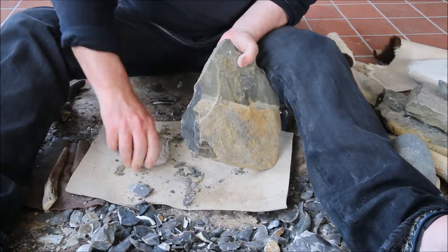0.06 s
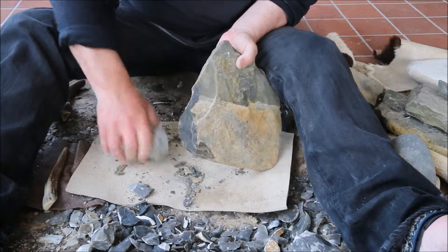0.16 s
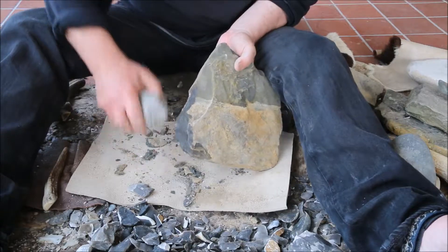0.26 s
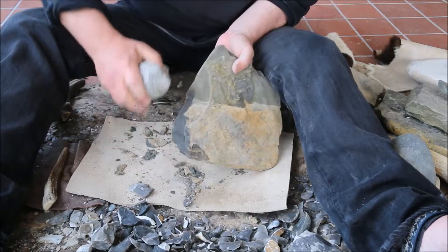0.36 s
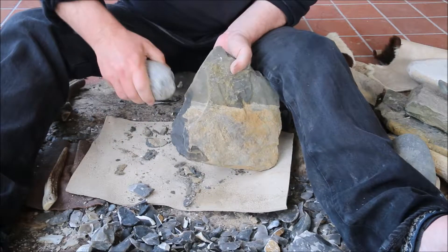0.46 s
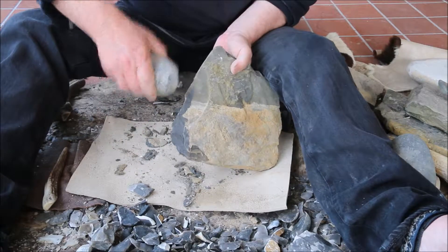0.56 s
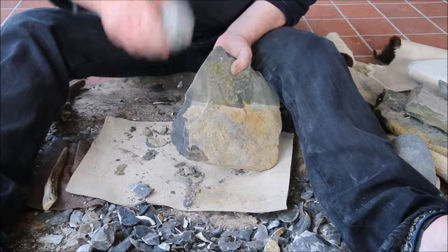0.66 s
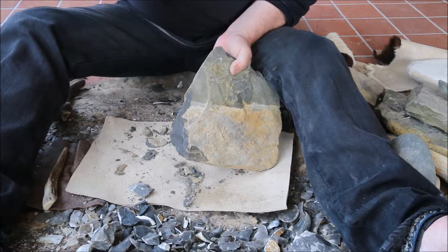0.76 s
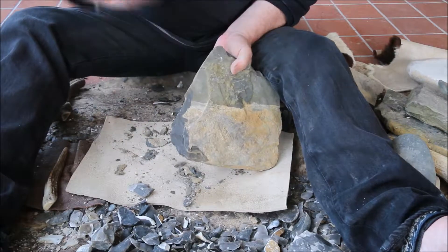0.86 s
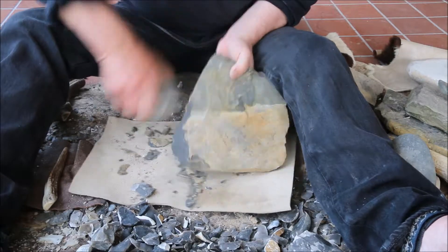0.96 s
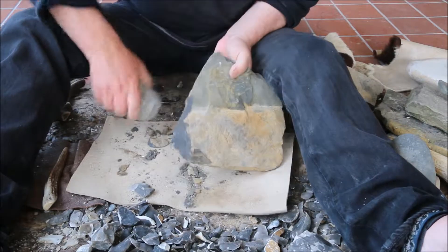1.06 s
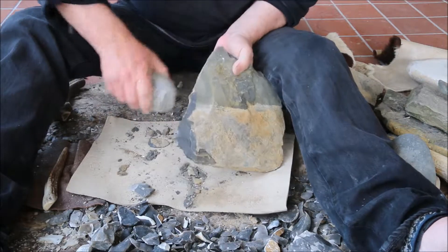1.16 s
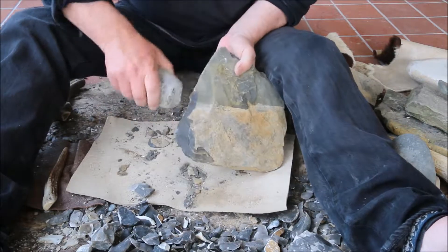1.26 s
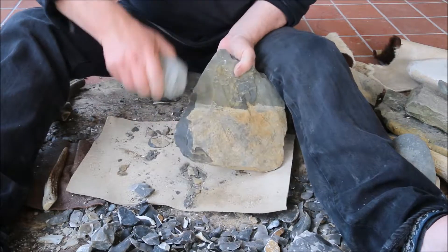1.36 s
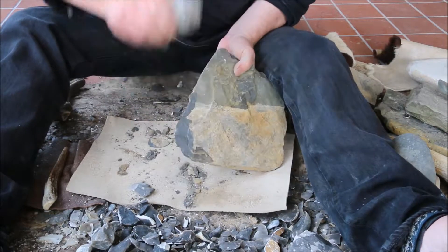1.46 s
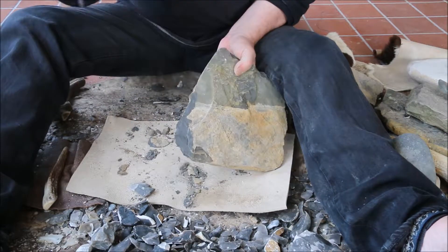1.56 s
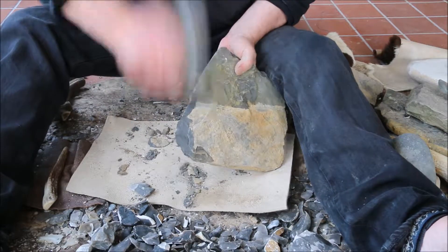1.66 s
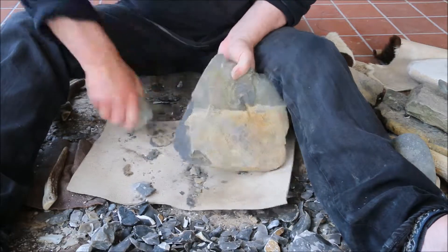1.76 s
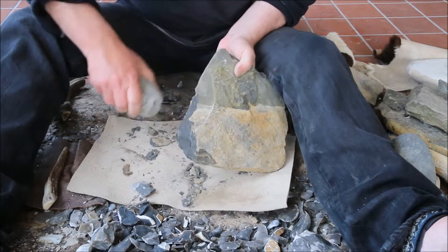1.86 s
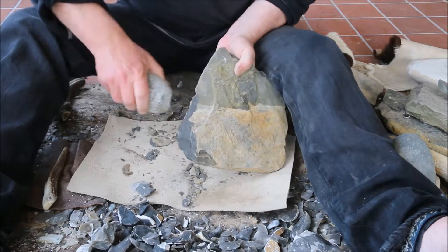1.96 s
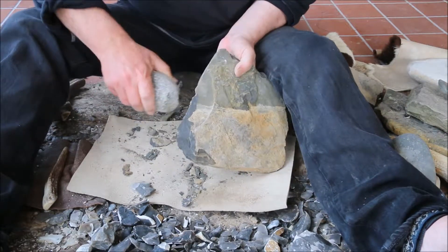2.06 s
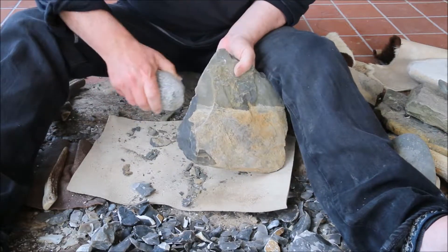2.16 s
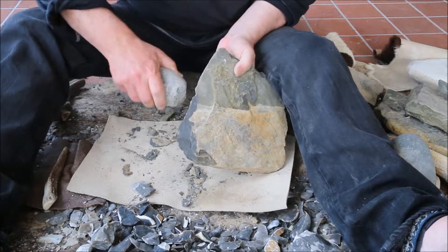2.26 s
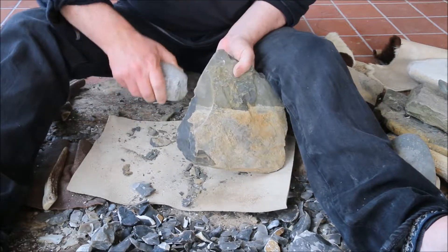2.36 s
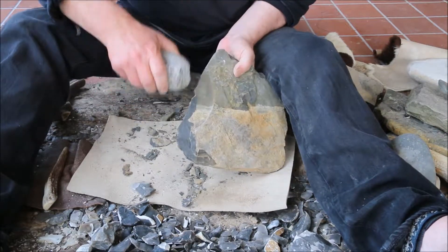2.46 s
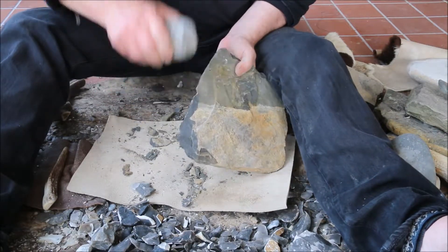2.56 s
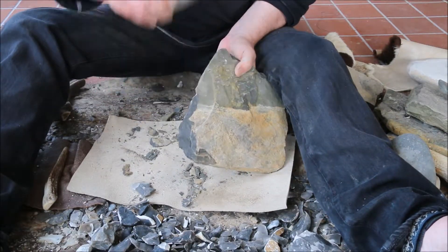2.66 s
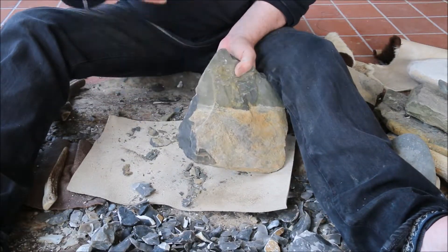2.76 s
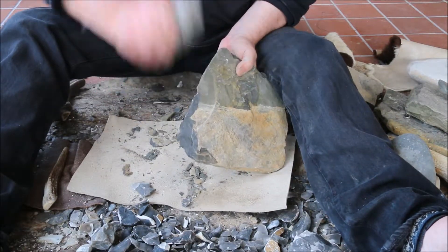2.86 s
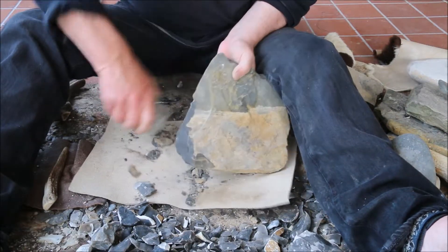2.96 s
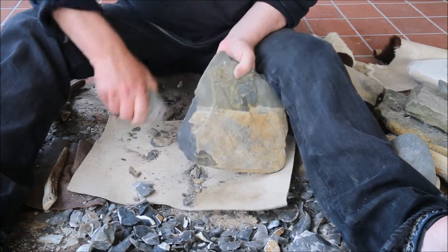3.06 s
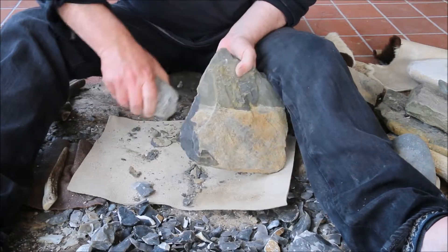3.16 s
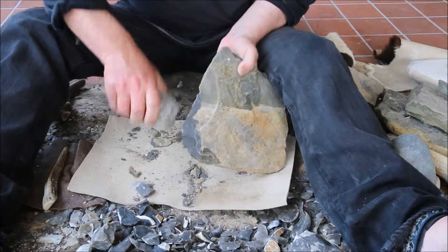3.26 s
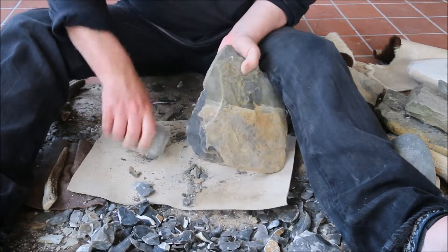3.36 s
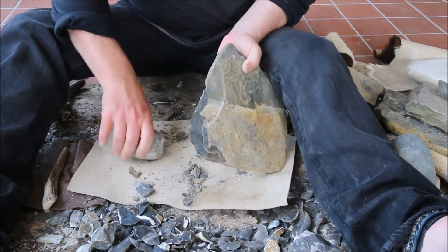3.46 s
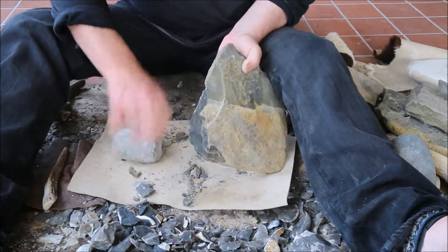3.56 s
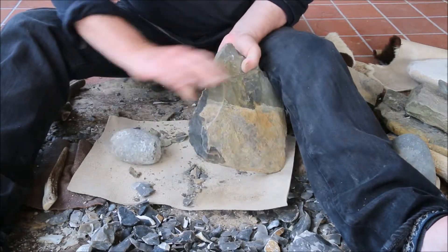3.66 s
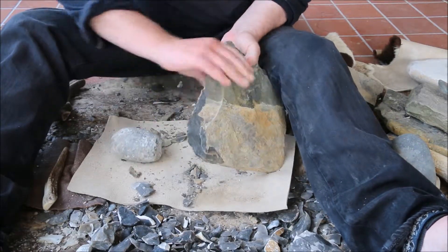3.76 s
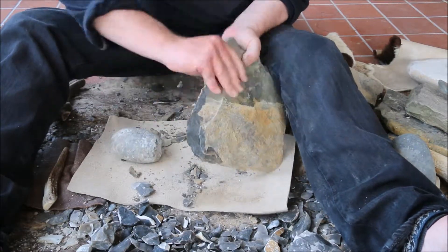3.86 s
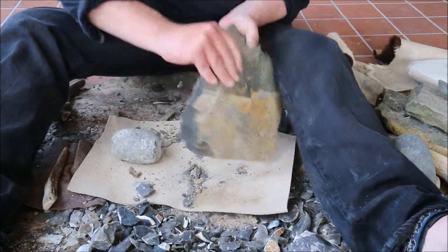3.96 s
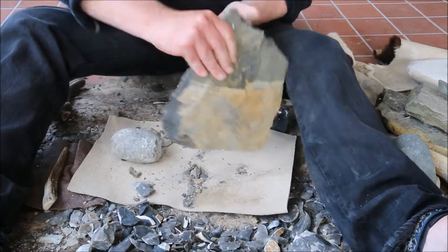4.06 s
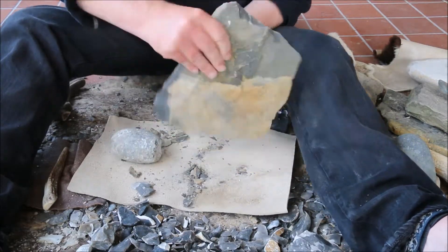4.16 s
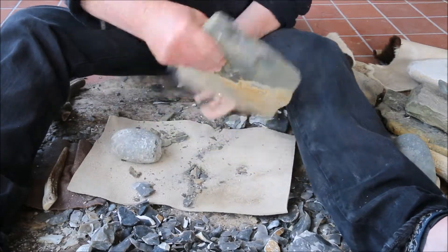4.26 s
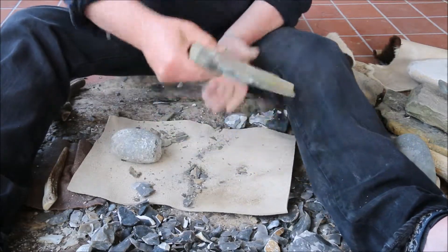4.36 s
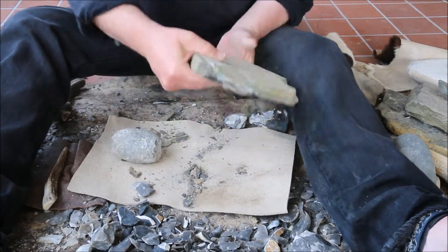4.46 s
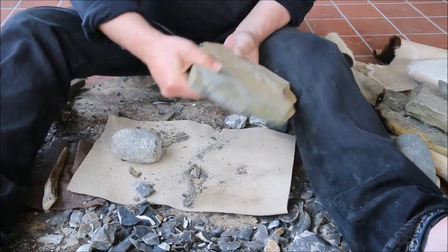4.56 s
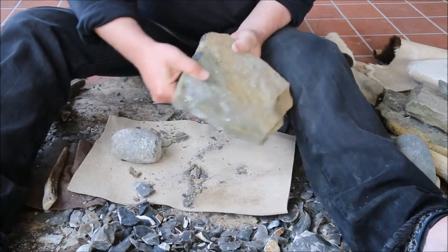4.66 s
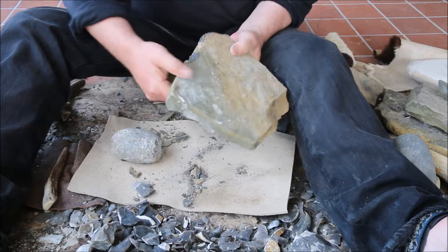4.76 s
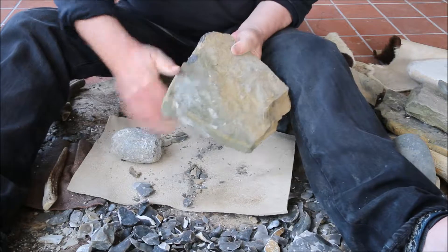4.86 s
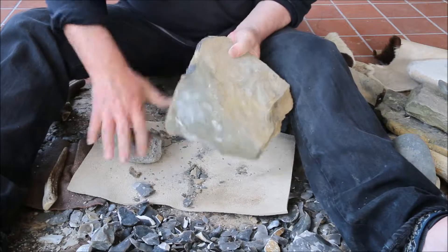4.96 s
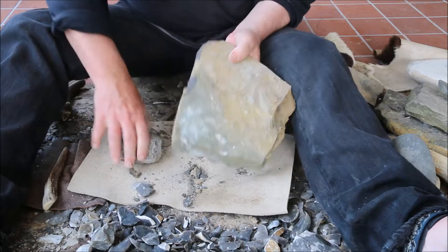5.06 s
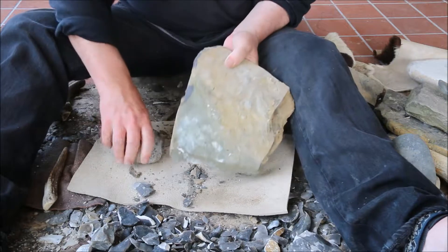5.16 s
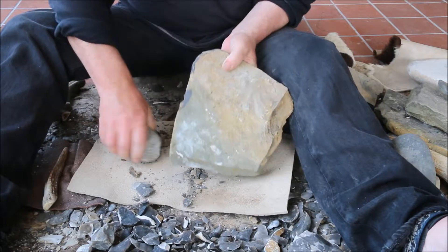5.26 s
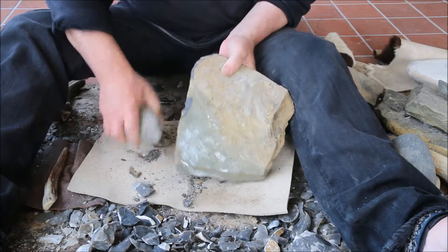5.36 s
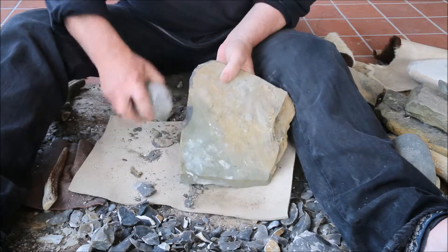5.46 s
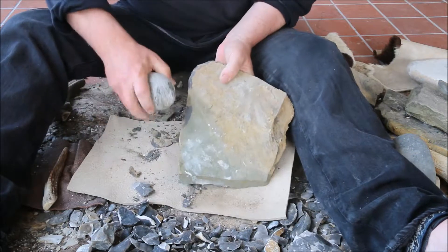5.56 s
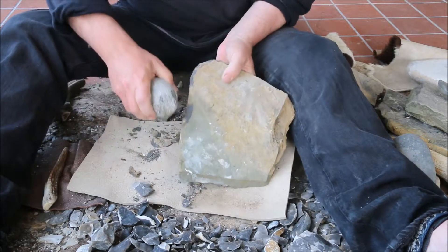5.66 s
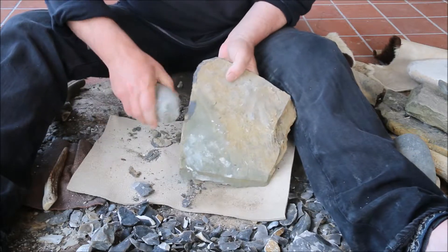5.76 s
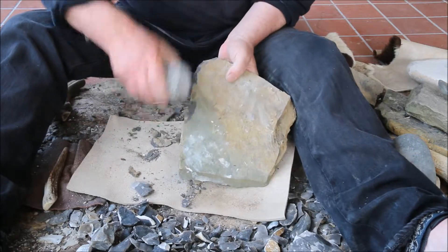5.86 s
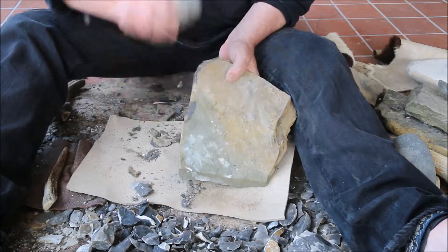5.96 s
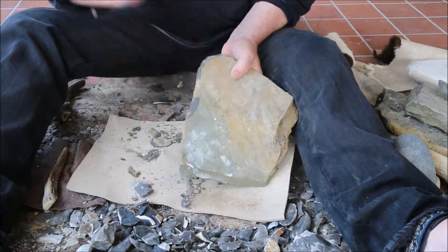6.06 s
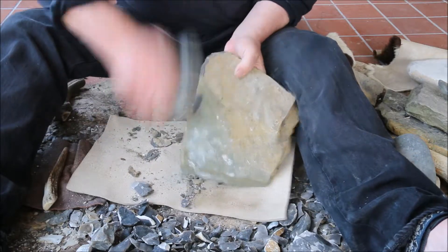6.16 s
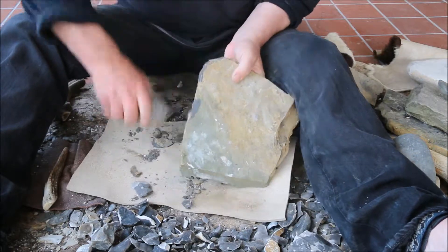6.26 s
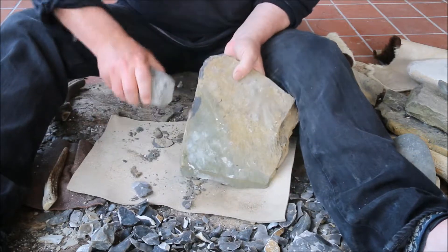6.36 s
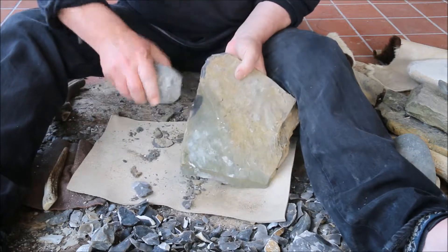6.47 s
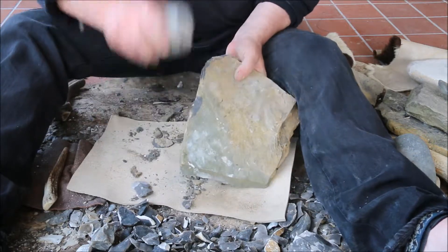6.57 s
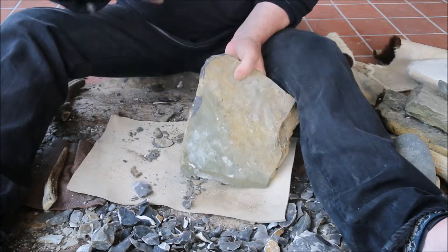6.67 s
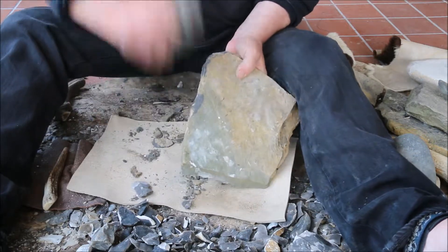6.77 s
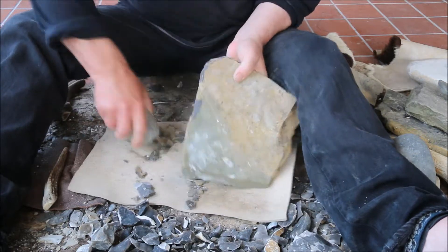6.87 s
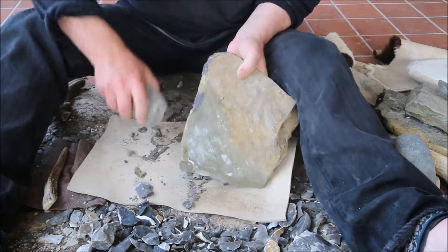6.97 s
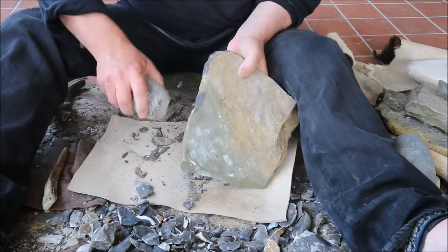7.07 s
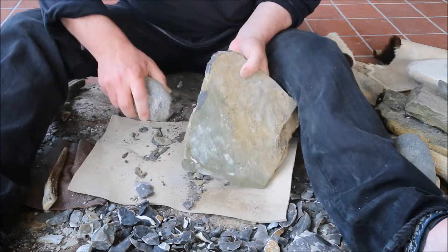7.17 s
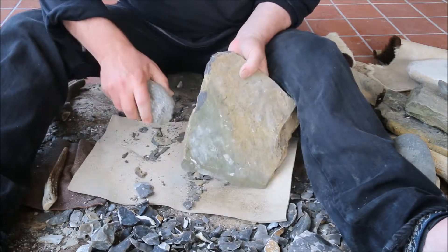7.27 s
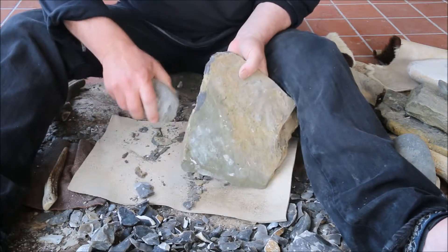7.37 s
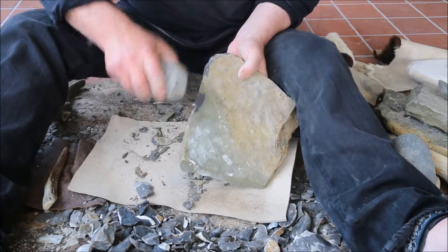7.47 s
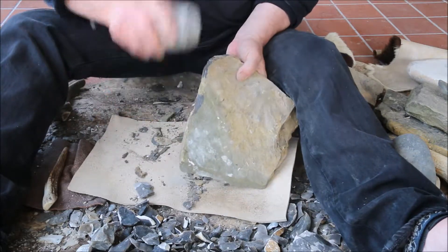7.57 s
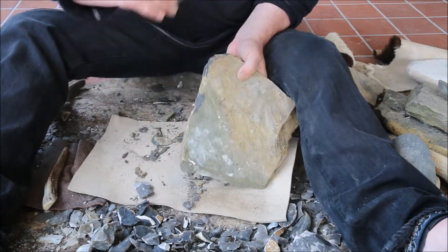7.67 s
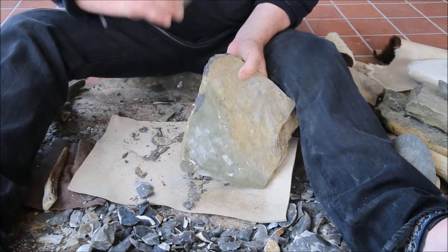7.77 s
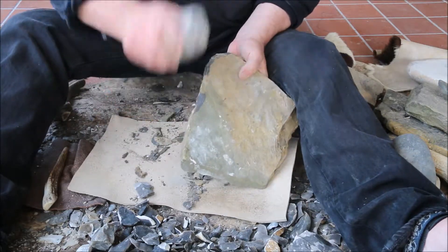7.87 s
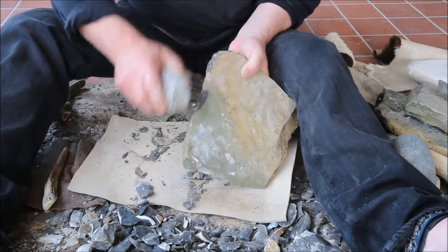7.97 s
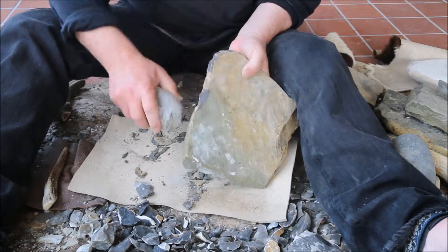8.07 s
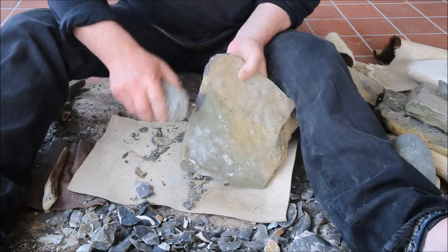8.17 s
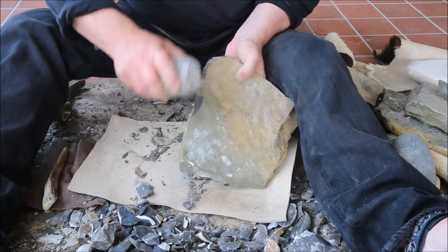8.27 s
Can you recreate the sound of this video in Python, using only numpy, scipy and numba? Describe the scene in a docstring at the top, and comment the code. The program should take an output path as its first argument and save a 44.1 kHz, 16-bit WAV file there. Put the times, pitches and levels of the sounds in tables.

```python
"""Faint room air, a soft rub and the click of a flake open a knapper's work in a hard, echoing room.
Five times a hammerstone cracks against the edge of a large stone, ringing it and crushing grit.
Between the blows the hammerstone knocks down on a mat, the stone is turned on the leg, and flakes fall.
Each crack overloads the recorder, whose limiter then holds the echo level; the whole scene fades in."""
import sys
import numpy as np
from scipy import signal
from scipy.fft import rfft, irfft
from scipy.io import wavfile
from scipy.ndimage import uniform_filter1d
from numba import njit

SR = 44100
rng = np.random.default_rng(int(sys.argv[2]) if len(sys.argv) > 2 else 0)


def file_out(sig):
    """Save sig as 16-bit WAV at sys.argv[1]."""
    # one column per channel
    cols = np.atleast_2d(sig).T
    # limit, then scale
    lim = np.clip(cols, -1, 1)
    pcm = np.round(lim * 32767).astype(np.int16)
    wavfile.write(sys.argv[1], SR, pcm)


N = 367353


def amp(db):
    """Decibels to gain."""
    return 10 ** (np.asarray(db) / 20)


def unit(x):
    """Scales to rms 1."""
    return x / np.sqrt(np.mean(x ** 2) + 1e-20)


def read(points, hz):
    """A spectrum, joined by straight lines over log frequency."""
    f, value = np.transpose(points)
    return np.interp(np.log(hz + 1), np.log(f + 1), value)


def add(track, s, sound):
    """Lays a sound into a track at s seconds."""
    part = track[round(s * SR):][:len(sound)]
    part += sound[:len(part)]


def colour(x, points):
    """Shapes a signal with an EQ curve of (Hz, dB) points."""
    n = x.shape[-1]
    return irfft(rfft(x) * amp(read(points, np.fft.rfftfreq(n, 1 / SR))), n)


def bins(size=8192):
    """Times and frequencies of one short sound."""
    return np.arange(size) / SR, np.maximum(np.fft.rfftfreq(size, 1 / SR), 1)


def resonances(modes, hz, skirt):
    """Gain of (Hz, width Hz, dB) modes; neighbours partly cancel, so skirts fall by the power skirt."""
    centre, width, db = np.transpose(modes)[:, :, None]
    detune = (hz ** 2 - centre ** 2) / (hz * width)
    return np.sqrt(np.sum(amp(db) ** 2 / (1 + detune ** 2) ** skirt, axis=0))


def struck(gain):
    """The ring of a body with this gain after one instant tap: sharp start, dying tail, peak 1."""
    log_gain = np.log(np.maximum(gain / gain.max(), amp(-100)))
    analytic = signal.hilbert(np.concatenate([log_gain, log_gain[-2:0:-1]]))
    sound = irfft(np.exp(analytic.conj())[:len(gain)])  # minimum phase
    return sound / abs(sound).max()


def rough_contact(ring, decay_s):
    """A dying burst of noise excites a body that has this ring."""
    t = np.arange(len(ring)) / SR
    burst = rng.standard_normal(len(t)) * np.exp(-t / decay_s)
    return signal.fftconvolve(burst / np.linalg.norm(burst), ring)[:len(t)]


def diffuse(pair, likeness, spacing_m=0.063):
    """Sound from all sides at two microphones: alike in the bass, unrelated above."""
    n, (a, b) = pair.shape[1], rfft(pair)
    half_waves_per_m = np.fft.rfftfreq(n, 1 / SR) * 2 / 343
    coherence = np.clip(likeness * np.sinc(half_waves_per_m * spacing_m), -1, 1)
    mid, side = a * np.sqrt((1 + coherence) / 2), b * np.sqrt((1 - coherence) / 2)
    return irfft(np.array([mid + side, mid - side]), n)


# Room tone, heavy in the lows. Each row: frequency in Hz, level in dB.
AIR_EQ = [(20, -10.5), (52, 9.5), (90, -3.5), (200, 1), (430, -0.5), (1000, -2.5), (1850, -7.5), (2230, 1),
          (2550, -5), (5000, -8.5), (10000, -14), (16000, -15)]
def room_tone(air_db=-56, whine_db=-65.5, whine_hz=15591):
    """A bed of quiet room air with a thin electronic whine on top."""
    air = unit(colour(diffuse(rng.standard_normal((2, N)), likeness=0.28), AIR_EQ))
    whine = unit(np.sin(2 * np.pi * whine_hz * np.arange(N) / SR))
    return amp(air_db) * air + amp(whine_db) * whine


def friction(gain, eq, catches_per_s, catch_db, flutter_db):
    """Rubbing: a fine hiss with small catches of random size, under an unsteady pressure."""
    catches = (rng.random(N) < catches_per_s / SR) * rng.laplace(size=N)
    wobble = uniform_filter1d(uniform_filter1d(rng.standard_normal(N), size=700), size=300)
    pressure = amp(flutter_db * unit(wobble))
    rub = colour(rng.standard_normal(N) + amp(catch_db) * unit(catches), eq)
    return gain * unit(rub * pressure)


# The dull drag and the bright swish of cloth and skin. Each row: frequency in Hz, level in dB.
DRAG_EQ = [(60, -24), (180, -9.5), (350, 0.5), (750, -2.5), (1300, -11.5), (3000, -10.5), (7000, -29.5),
           (15000, -47.5)]
SWISH_EQ = [(200, -8.5), (800, -6), (2000, -1), (4000, -1), (7000, -5.5), (11000, -8.5), (16000, -12.5)]
# Strokes of stone and hands over mat and trouser leg.
# Each row: start in seconds, length in seconds, drag level in dB, swish level in dB.
STROKES = [(0.087, 0.14, -41, -48.5), (0.324, .06, -53.5, -54), (0.838, 0.18, -49, -60),
           (3.795, 0.2, -58, -52), (3.939, 0.21, -39, -44.5), (4.395, 0.2, -62.5, -58),
           (4.56, .23, -57, -55), (4.734, .14, -69, -57), (4.898, 0.066, -73, -55.5),
           (4.992, 0.08, -53.5, -55.5), (5.198, 0.132, -54, -57), (5.451, 0.13, -45.5, -49),
           (5.527, 0.51, -53, -62.5), (5.995, 0.25, -58.5, -65), (7.92, 0.22, -63, -79),
           (8.134, 0.3, -65.5, -66)]
def strokes(speed_up_share=0.44, speed_power=1.1):
    """Each stroke speeds up and slows to rest; its speed swells both the drag and the swish."""
    drag_gain, swish_gain = np.zeros(N), np.zeros(N)
    for start, length, drag_db, swish_db in STROKES:
        elapsed = np.arange(0, length, 1 / SR) / length
        speed = np.sin(np.pi * np.interp(elapsed, [0, speed_up_share, 1], [0, .5, 1]))
        swell = speed ** speed_power
        add(drag_gain, start, amp(drag_db) * swell)
        add(swish_gain, start, amp(swish_db) * swell)
    drag = friction(drag_gain, DRAG_EQ, catches_per_s=370, catch_db=-7.0, flutter_db=4.5)
    swish = friction(swish_gain, SWISH_EQ, catches_per_s=460, catch_db=-9.5, flutter_db=1.5)
    return drag, swish


# The ring of the large stone, rubbed or struck. Each row: pitch in Hz, width in Hz, level in dB.
STONE_MODES = [(1848, 60, -3), (2135, 130, 0), (3290, 170, -14), (4335, 220, -12), (4655, 170, -5),
               (5570, 260, -26), (6980, 280, -19), (8300, 320, -27), (9450, 340, -17), (11100, 400, -30)]
def rubbed_stone(rub, ring_db=-12):
    """Skin and cloth sliding over the stone keep its main mode faintly ringing."""
    _, hz = bins()
    ring = struck(resonances([STONE_MODES[1]], hz, skirt=1.4))
    return amp(ring_db) * signal.fftconvolve(rub, ring / np.linalg.norm(ring))[:N]


# Clicks of falling flakes and crumbs. Each row: start in seconds, level in dB, pitch in Hz.
FLAKE_CLICKS = [(0.114, -20.5, 2780), (.218, -33, 9100), (.345, -37, 5200), (0.889, -34, 6150),
                (1.4555, -18, 4700), (3.266, -30, 4640), (3.6472, -32, 4600), (3.6981, -26.5, 4120),
                (4.944, -38, 2800), (5.2536, -33, 3800), (5.479, -35, 5200), (5.63, -39, 7900)]
def flakes(width_hz=900, snap_db=-4, snap_s=0.0016):
    """A chip lands with a snap and rings very briefly around its pitch."""
    track, (_, hz) = np.zeros(N), bins()
    for start, db, pitch_hz in FLAKE_CLICKS:
        modes = [(pitch_hz, width_hz, 0), (pitch_hz * 1.15, 3 * width_hz, -5)]
        chip = struck(resonances(modes, hz, skirt=1))
        snap = rough_contact(chip, snap_s)
        add(track, start, amp(db) * (chip + amp(snap_db) * snap))
    return track


# The ring of the floor and its gritty mat. Each row: pitch in Hz, width in Hz, level in dB.
FLOOR_MODES = [(61.3, 30, -5.5), (190.7, 220, -1), (410, 120, -0.5), (570, 130, -6), (728, 83, 2),
               (984, 68, 1.5), (1240, 210, -6), (2300, 1300, -6.5), (3280, 980, -13), (11090, 6500, -14)]
# Dull knocks of stone on the mat.
# Each row: start in seconds, level in dB, low cut in Hz, high cut in Hz, crunch decay in seconds.
MAT_KNOCKS = [(.125, -22.5, 453, 1420, 0.045), (0.22, -30, 396, 1000, 0.0071), (.6, -42.5, 400, 910, 0.013),
              (3.266, -26.5, 440, 850, 0.0016), (3.443, -1, 55, 4400, 0.015),
              (3.492, -16.5, 150, 1500, .01), (4.058, -20, 392, 750, 0.023), (5.01, -47, 443, 880, 0.0088),
              (5.265, -31, 695, 1480, 0.0075), (5.487, -32, 250, 700, .008),
              (5.516, -28.5, 252, 816, 0.014), (5.642, -34.5, 401.5, 875, 0.01),
              (5.812, -29, 378, 560, 0.016), (6.154, -40.5, 246, 750, 0.013)]
def knocks():
    """Stone lands on the gritty mat: a first touch and a short crunch shake the floor."""
    track, (_, hz) = np.zeros(N), bins()
    for start, db, low_hz, high_hz, crunch_s in MAT_KNOCKS:
        band = 1 / np.sqrt((1 + (low_hz / hz) ** 4) * (1 + (hz / high_hz) ** 4))
        touch = struck(resonances(FLOOR_MODES, hz, skirt=1.2) * band)
        crunch = rough_contact(touch, crunch_s)
        add(track, start, amp(db) * (touch + crunch))
    return track


# The bite of crushed grit. Each row: frequency in Hz, level in dB.
GRIT_EQ = [(200, -2.5), (500, -17.5), (1500, -4), (2500, 10.5), (5000, -5.5), (8000, -4.5), (11000, -17.5),
           (16000, -12)]
# Hammerstone blows. Each row: start in seconds, force in dB, brightness in dB per octave, grit in dB,
# shove in dB, then a trim in dB for each of the five lowest modes, set by where the edge is struck.
HAMMER_BLOWS = [(0.9742, 26, -3, -43, -18.5, 6, 6.5, -18.5, 1, -4.5),
                (1.7213, 26.5, -0.5, -8, -16, -1, 1, 4.5, 2, 0),
                (2.9537, 18.8, 0.5, -22, -17, -22, 1.5, 7.5, 3.5, -7),
                (6.2166, 20.2, -10, -27.5, -11.5, 12.5, 6, 2.5, -2, 1),
                (6.8472, 22, -1, -10, -23, -3, 1.5, -4.5, -10.5, 3.5)]
def blows(shove_hz=700, shove_width_hz=1100, low_cut_hz=210,
          grit_s=0.00099, crumble_db=-25, crumble_s=0.02):
    """Each blow shoves the stone, sets it ringing, and crushes grit under the hammerstone."""
    track, (t, hz) = np.zeros(N), bins()
    # a softer contact dulls everything above the main mode
    octaves = np.log2(np.maximum(hz / STONE_MODES[1][0], 1))
    for start, force_db, tilt_db, grit_db, shove_db, *trims_db in HAMMER_BLOWS:
        modes = np.array(STONE_MODES + [(shove_hz, shove_width_hz, shove_db)], float)
        modes[:len(trims_db), 2] += trims_db
        body = struck(resonances(modes, hz, skirt=1.33) * amp(tilt_db * octaves))
        crush = np.exp(-t / grit_s) + amp(crumble_db) * np.exp(-t / crumble_s)
        grit = unit(colour(rng.standard_normal(len(t)), GRIT_EQ)) * crush
        add(track, start, amp(force_db) * (body + amp(grit_db) * grit))
    # a hand-sized body radiates little bass
    return signal.lfilter(*signal.butter(2, low_cut_hz, "high", fs=SR), track)


# Reverb length. Each row: frequency in Hz, seconds to fall by 60 dB.
TAIL_T60 = [(100, 1), (300, 0.58), (1000, 0.86), (2100, 0.8), (4600, 0.75), (9000, 0.63), (15000, 0.12)]
# Reverb tone. Each row: frequency in Hz, level in dB.
TAIL_EQ = [(50, -14.5), (140, -7), (300, 4), (850, -3), (1000, 0.5), (1150, -3), (1650, 4), (2100, 0),
           (3000, -3), (4600, 2), (9000, -5), (15000, 5)]
# Early reflections off nearby surfaces. Each row: delay in seconds, level in dB.
REFLECTIONS = [(.0062, -17), (.0115, -7.5), (.0128, -15.5), (.0215, -12)]
def room(x, wet_db, predelay_s=0.00075, build_s=0.004, ear_lag_s=.00018):
    """The direct sound, a few early echoes, and a long tail whose top end dies first."""
    noise = diffuse(rng.standard_normal((2, int(1.3 * SR))), likeness=0.97)
    hz, t, bands = signal.stft(noise, SR, nperseg=256)
    decay = np.exp(-np.log(1000) * t / read(TAIL_T60, hz)[:, None])
    tail = signal.istft(bands * decay * amp(read(TAIL_EQ, hz))[:, None], SR, nperseg=256)[1]
    tail_age = np.maximum(np.arange(tail.shape[1]) / SR - predelay_s, 0)
    response = amp(wet_db) * tail * (1 - np.exp(-tail_age / build_s)) / np.sqrt(SR / 20)
    response[:, 0] += 1  # direct sound
    for k, (delay, db) in enumerate(REFLECTIONS):
        for ear in range(2):  # echoes come from left and right in turn
            response[ear, round((delay + ear_lag_s * ((k + ear) % 2)) * SR)] += amp(db)
    return signal.fftconvolve(x[None], response, axes=1)[:, :N]


def scene():
    """Handling and cracks sit dead centre in the same room, over the room tone."""
    drag, swish = strokes()
    cracks = room(blows(), wet_db=-3.5)
    floor = room(knocks() + drag, wet_db=-0.5)
    cloth = room(swish + rubbed_stone(swish), wet_db=0)
    chips = room(flakes(), wet_db=3)
    return room_tone() + cloth + chips + floor + cracks


@njit
def gain_reduction(over_db, attack_s, release_s):
    """The limiter's cut in dB: it climbs quickly to the excess level and sinks back slowly."""
    attack, release = 1 / (attack_s * SR), 1 / (release_s * SR)
    out, held = np.zeros(len(over_db)), 0.
    for i in range(len(over_db)):
        held += (over_db[i] - held) * (attack if over_db[i] > held else release)
        out[i] = held
    return out


# One long fade-in across the scene. Each row: time in seconds, linear gain.
FADE_IN = [(0, .055), (8.33, .95)]
def record(dry, threshold_db=-12, attack_s=0.0015, release_s=0.058, knee=6, high_cut_hz=16300):
    """The cracks outrun the limiter and soft-clip; then come a treble dip, the fade-in and a high cut."""
    over_db = np.maximum(20 * np.log10(abs(dry).max(0) + 1e-9) - threshold_db, 0)
    limited = dry / amp(gain_reduction(over_db, attack_s, release_s))
    clipped = limited / (1 + abs(limited) ** knee) ** (1 / knee)
    softened = colour(clipped, [(0, 0.0004), (9000, 0.031), (14000, -2)])
    fade = np.interp(np.arange(N) / SR, *np.transpose(FADE_IN))
    low_pass = signal.firwin(255, high_cut_hz, window=("kaiser", 8), fs=SR)
    return signal.oaconvolve(softened * fade, low_pass[None], "same")


dry = scene()
out = record(dry)
file_out(out)
```